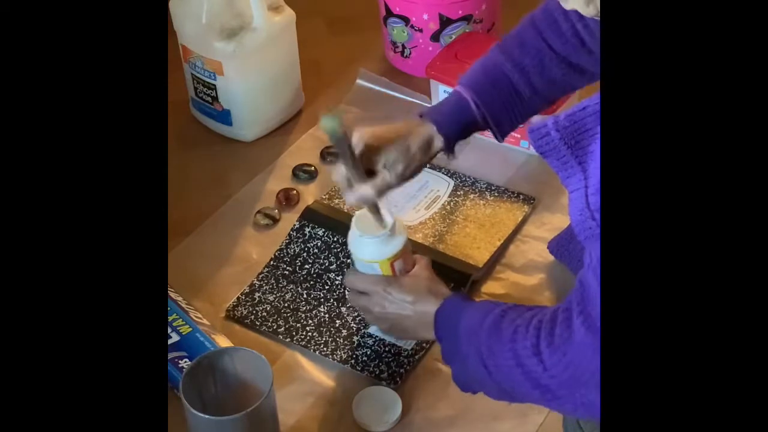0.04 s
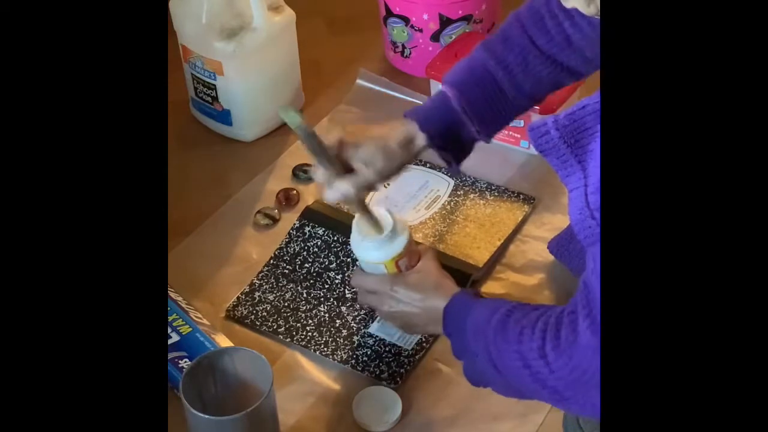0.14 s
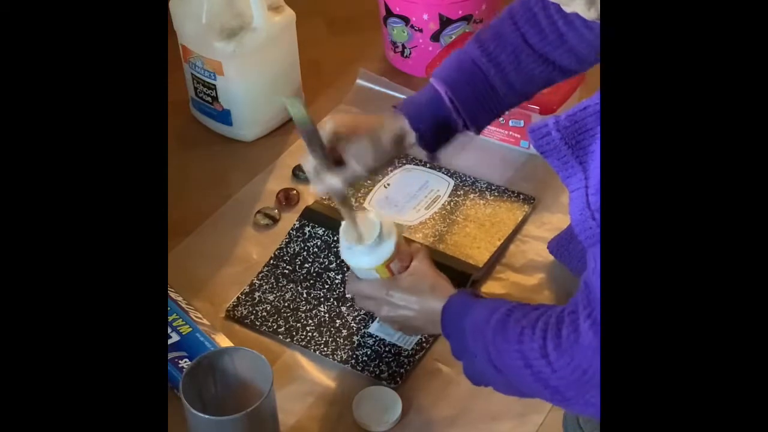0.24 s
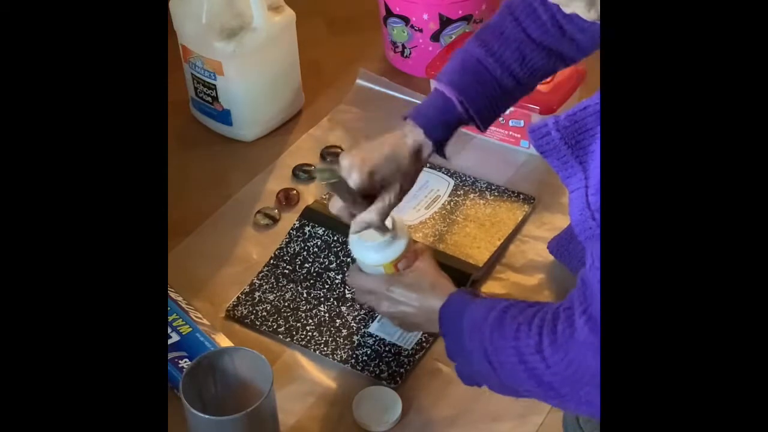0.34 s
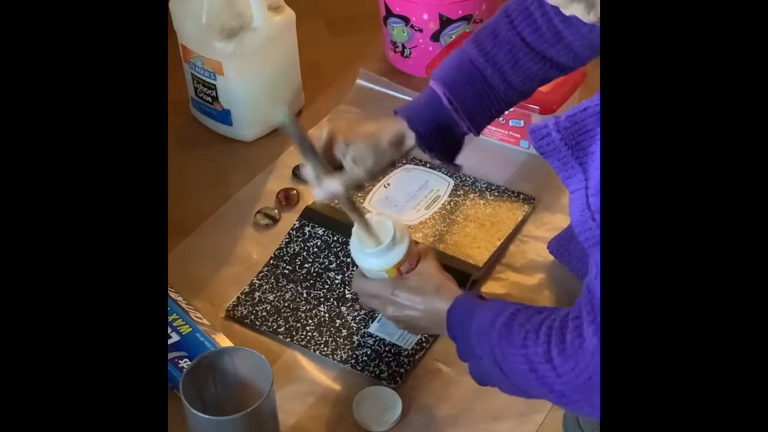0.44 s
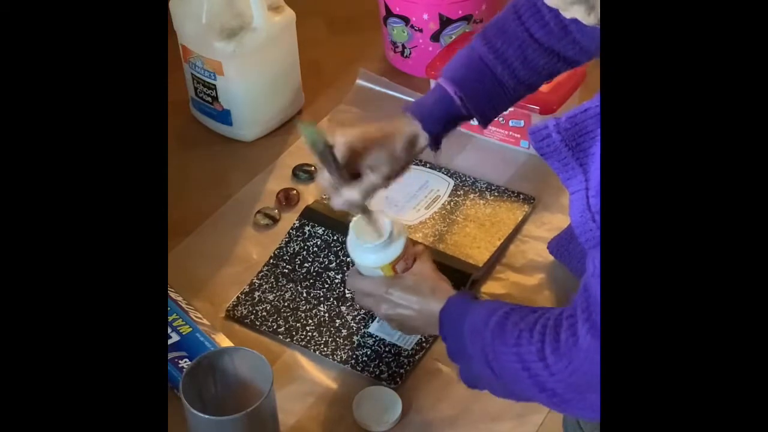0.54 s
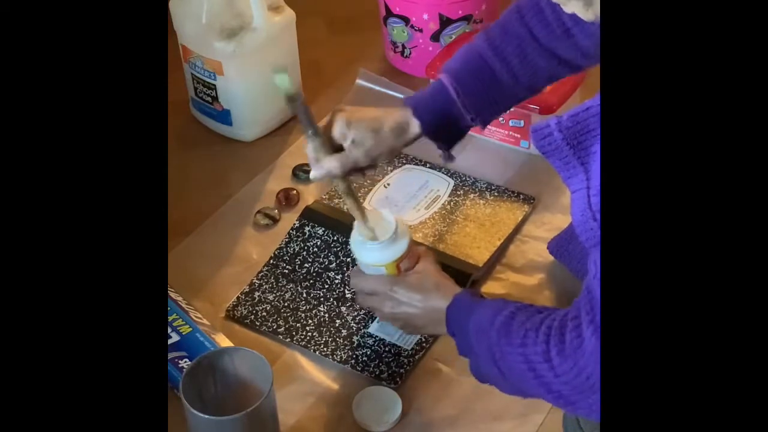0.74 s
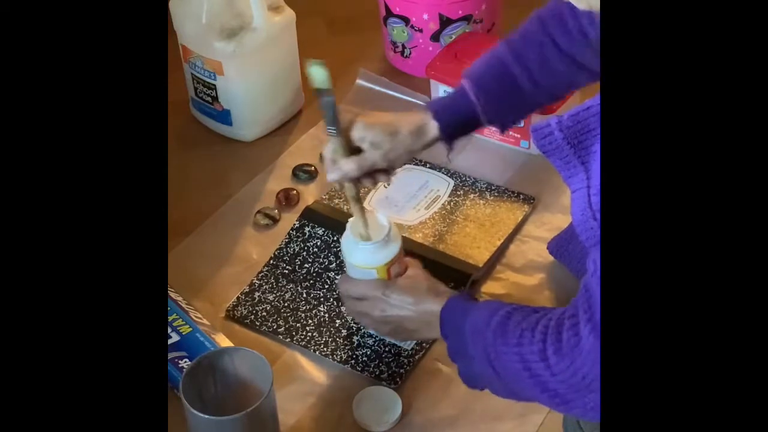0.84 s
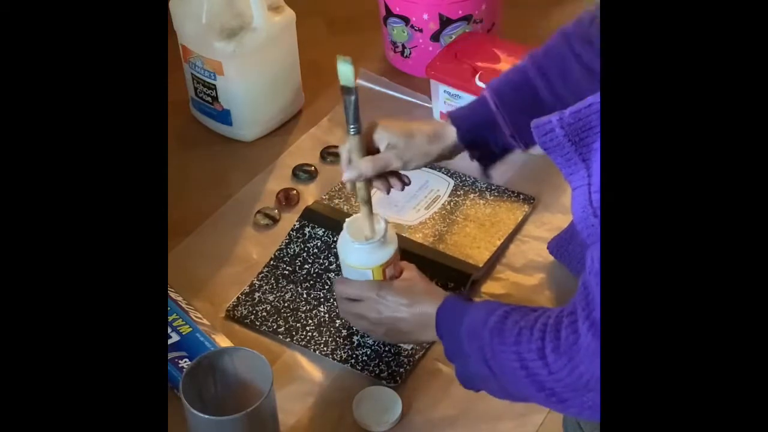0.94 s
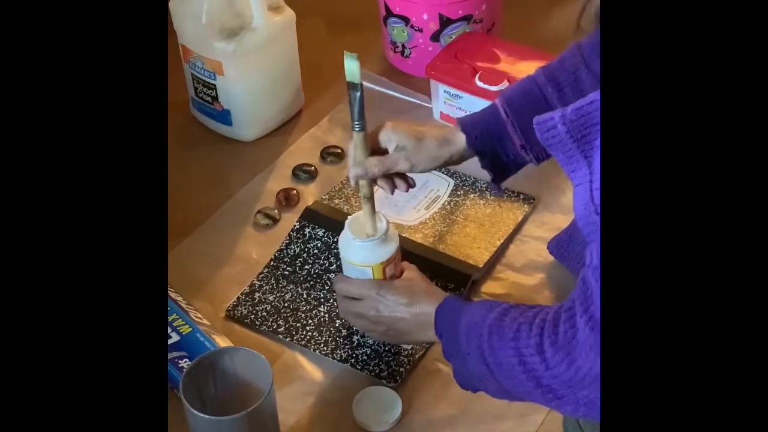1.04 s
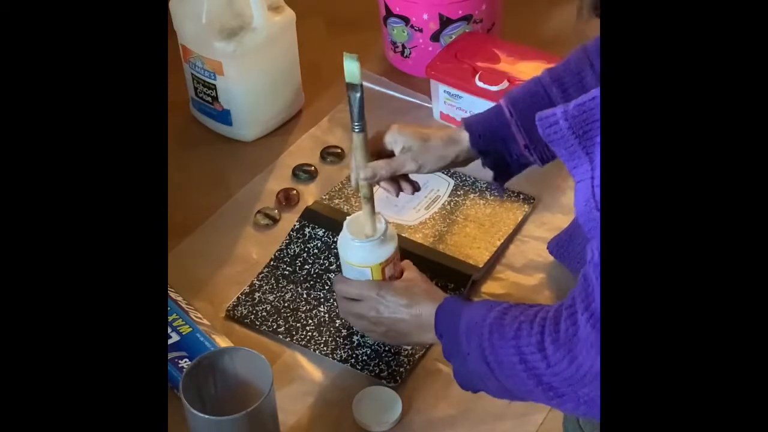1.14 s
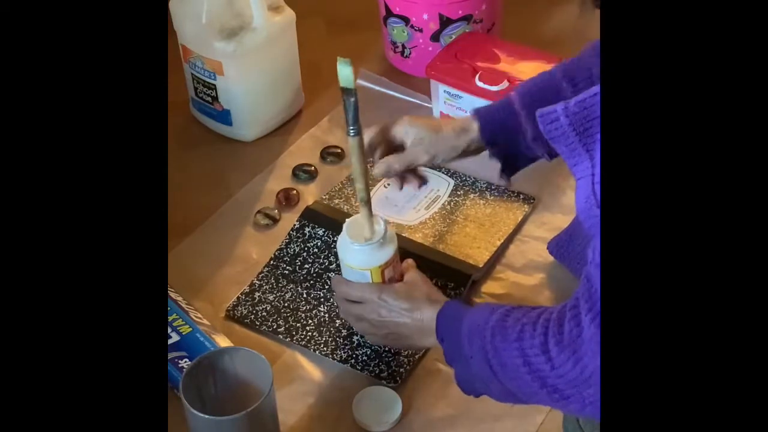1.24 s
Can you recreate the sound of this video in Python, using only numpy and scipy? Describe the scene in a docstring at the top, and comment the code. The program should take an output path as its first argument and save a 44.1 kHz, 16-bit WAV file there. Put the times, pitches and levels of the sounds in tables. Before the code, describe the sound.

Hollow knocks and sharp clicks of a brush handle stirring in a plastic jar, close, in a small room

```python
"""A knock on a plastic jar is still ringing as a brush handle stirs glue in it, on a table, over a low hum and hiss.
The handle clicks on the rim (dying modes, a noise snap, a late table thud) and knocks the wall (hollow sine swells).
Blows weaken after half a second; a sleeve rustles (grainy noise) as the hand lets go, with faint last touches.
A small room answers each blow with echoes and a diffuse tail; two close microphone ports listen."""
import sys
import numpy as np
from scipy import signal
from scipy.fft import rfft, irfft, next_fast_len
from scipy.io import wavfile
from scipy.ndimage import map_coordinates

SR = 44100
rng = np.random.default_rng(int(sys.argv[2]) if len(sys.argv) > 2 else 0)


def volts(x):
    """Linear amplitude factor 10**(x/20) for a level x in dB, scalar or array-like."""
    e = np.asarray(x, float) / 20
    return 10 ** e


def pcm_store(signal):
    """Save signal as 16-bit PCM."""
    levels = np.round(np.clip(np.atleast_2d(signal), -1, 1) * 32767)
    wavfile.write(sys.argv[1], SR, levels.astype(np.int16).T)


N = 57330
LEAD_IN = SR // 10  # samples before zero, for a knock that still rings

# table modes: f/Hz, level/dB, t60/s
TABLE_MODES = [(140.2, 0, 0.045), (187, 6, 0.032), (367.2, -8, 0.048), (502, 0, 0.052), (710, -2.5, .04)]


def along(points, hz):
    """Interpolates (f/Hz, value) points on a log frequency axis."""
    f, v = np.transpose(points)
    return np.interp(np.log(hz + 1), np.log(f + 1), v)


def filtered(x, response):
    """x times a complex response of frequency."""
    m = next_fast_len(x.shape[-1] + 8192)
    spectrum = rfft(x, m) * response(np.fft.rfftfreq(m, 1 / SR))
    return irfft(spectrum, m)[..., :x.shape[-1]]


def noise(colour, size):
    """Coloured noise of rms 1."""
    x = filtered(rng.standard_normal(size), lambda hz: volts(along(colour, hz)))
    return x / x.std()


def diffuse(three):
    """One shared signal plus, for each port, a part of its own; the sum keeps its power."""
    # own part relative to the shared: f/Hz, level/dB
    own_share = [(100, -14), (300, -3), (600, 3), (1500, 9), (2400, 16.5), (4000, -19), (12000, -13.5)]
    own = filtered(three[1:], lambda hz: volts(along(own_share, hz)))
    return filtered(three[0] + own, lambda hz: 1 / np.sqrt(1 + volts(2 * along(own_share, hz))))


def background():
    """Low rumble and faint hiss as diffuse noise; hum as sines wavering in level and phase."""
    # hum partials: f/Hz, level/dB
    hum_partials = [(59, -58), (121, -67.5), (208, -57.5)]
    # rumble spectrum: f/Hz, level/dB
    rumble_colour = [(12, -49), (25, -26.5), (58, -2.5), (85, -16.5), (125, -10.5), (160, -32.5),
                     (210, -11.5), (260, -34), (350, -32.5), (450, -31.5), (650, -33.5), (1100, -91)]
    # hiss spectrum: f/Hz, level/dB
    hiss_colour = [(300, 3), (600, -16.5), (1500, -14), (3000, -17), (6000, -19.5), (10000, -21.5),
                   (15500, -26), (16400, -60)]
    rumble_db, hiss_db, waver_hz = -53.5, -61, 9
    t = np.arange(N) / SR

    def waver():
        return map_coordinates(rng.standard_normal(int(N * waver_hz / SR) + 4), [t * waver_hz])

    hum = np.zeros(N)
    for hz, db in hum_partials:
        level = volts(db + 4 * waver())
        hum += level * np.sin(2 * np.pi * hz * t + 0.8 * waver())
    rumble = volts(rumble_db) * diffuse(noise(rumble_colour, (3, N)))
    hiss = volts(hiss_db) * diffuse(noise(hiss_colour, (3, N)))
    return hum + rumble + hiss


def sleeve():
    """Cloth friction: noise with a moving level and random grain."""
    # rustle level: t/s, level/dB
    rustle_level = [(.55, -48), (.62, -52.5), (0.678, -52), (0.719, -46.5), (.745, -40), (.775, -45.5),
                    (0.798, -54), (0.839, -58.5), (.9, -86), (1.101, -80.5), (1.3, -61.5)]
    # cloth spectrum: f/Hz, level/dB
    cloth_colour = [(180, -26.5), (300, -5), (600, -6.5), (800, -17.5), (930, 6), (1100, -9), (2000, -11.5),
                    (4000, -9.5), (7000, -24.5), (11000, -28.5), (15800, -48)]
    grain_samples, grain_depth_db = 150, 3.1
    s, db = np.transpose(rustle_level)
    grain = map_coordinates(rng.standard_normal(N // grain_samples + 4), [np.arange(N) / grain_samples])
    level_db = np.interp(np.arange(N) / SR, s, db) + grain_depth_db * grain
    return volts(level_db) * diffuse(noise(cloth_colour, (3, N)))


def reflections():
    """Direct sound plus dull, thin copies off near surfaces, one set per port."""
    # left port: delay/s, level/dB (before the band filter)
    left_echoes = [(.0063, -11), (.0104, -11), (.0153, -5.5), (.0224, -6.5), (.0319, -11.5), (.0375, -19),
                   (.0470, -17), (.0551, -13), (.0795, -18)]
    # right port: delay/s, level/dB (before the band filter)
    right_echoes = [(.0088, -9.5), (.0120, -14), (.0155, -8.5), (.0201, -15), (.0249, -8), (.0322, -14),
                    (.0383, -17), (.0427, -12.5), (.0500, -16)]
    dull_hz, thin_hz = 1500, 450
    taps = np.zeros((2, SR // 2))
    for port, echoes in enumerate([left_echoes, right_echoes]):
        for delay_s, db in echoes:
            taps[port, round(delay_s * SR)] = volts(db)
    taps = filtered(taps, lambda hz: 1 / (1 + (hz / dull_hz) ** 4) / (1 + (thin_hz / (hz + 1)) ** 4))
    taps[:, 0] += 1
    return taps


def diffuse_tail():
    """Fresh noise that builds up and decays at its own rate in each band."""
    # decay: f/Hz, t60/s
    decay_t60 = [(150, 0.5), (500, 0.21), (850, 0.35), (1300, 0.29), (2000, 0.24), (6000, 0.24),
                 (12000, 0.19)]
    # build-up: f/Hz, time constant/s
    build_up = [(300, .004), (600, 0.027), (1100, 0.027), (1700, 0.0054), (4000, 0.001)]
    # tail spectrum over the room level: f/Hz, level/dB
    tail_colour = [(150, -6), (400, 10.5), (850, -5.5), (1300, 4.5), (2000, -4.5), (2600, 2.5), (3400, 0.5),
                   (5000, -3), (12000, -7)]
    late_s = 0.0013
    hz, t, z = signal.stft(rng.standard_normal((3, SR // 2)), SR, nperseg=256)
    decay = volts(-60 * t / along(decay_t60, hz)[:, None])
    build = 1 - np.exp(-t / along(build_up, hz)[:, None])
    tail = signal.istft(z * decay * build, SR, nperseg=256)[1][:, :SR // 2]
    tail = diffuse(tail * (np.arange(SR // 2) > late_s * SR))
    return filtered(tail / np.linalg.norm(tail[0]), lambda hz: volts(along(tail_colour, hz)))


def room(hit, tail_db=0):
    """Convolves a blow with the near reflections and a diffuse tail."""
    room_db = -2.5
    response = reflections() + volts(room_db + tail_db) * diffuse_tail()
    return signal.fftconvolve(hit[None], response, axes=1)


def ring(modes, t, rise_s):
    """Dying modes, their levels a little different at each blow."""
    total = np.zeros(len(t))
    for hz, db, t60_s in modes:
        level = volts(db + rng.normal(0, 4.2) - 60 * t / t60_s)
        total += level * np.sin(2 * np.pi * hz * t)
    return (1 - np.exp(-t / rise_s)) * total


def crack(colour, t):
    """The short dry snap of contact: a noise burst."""
    t60_s, rise_s = 0.013, 0.0008
    return noise(colour, len(t)) * (1 - np.exp(-t / rise_s)) ** 2 * volts(-60 * t / t60_s)


def add(track, s, sound):
    """Mixes a sound in at a time in seconds."""
    start = LEAD_IN + round(s * SR)
    track[:, start:start + sound.shape[1]] += sound


def rim_clicks():
    """Handle on the rim: handle and rim modes ring, contact snaps, the table thuds a little later."""
    # clicks: t/s, ring level/dB, crack level/dB, table thud level/dB, tail over the room level/dB
    click_list = [(.0088, -18, -13.5, -24.5, 0), (.1580, -13, -10.5, -29, 2.5),
                  (0.2594, -14, -5.5, -28, 0.5), (0.4145, -10.5, -11, -26, 1),
                  (0.502, -24.5, -58.5, -35, -1), (0.604, -44.5, -69, -52, 3.5), (0.618, -32, -71, -76, -3),
                  (.7040, -26, -44, -44, -0.5), (0.7569, -27, -31, -34, 0.5), (0.8596, -43.5, -57, -73, -3)]
    # handle modes: f/Hz, level/dB, t60/s
    handle_modes = [(1932, -2, 0.026), (2020, -3, 0.029)]
    # rim modes, relative to the crack: f/Hz, level/dB, t60/s
    rim_modes = [(3370, -1, .007), (5300, -8, .005), (6900, -4, .01), (7600, -6, .005), (9900, -10, .006)]
    # crack spectrum: f/Hz, level/dB
    crack_colour = [(300, -36), (1000, -17), (1500, -16), (2600, -37), (4000, -3.5), (6000, -8), (9000, -2),
                    (12000, -17.5), (15000, -21), (16000, -36.5)]
    thud_late_s, thud_rise_s, ring_rise_s = 0.004, 0.0047, 0.0015
    track, t = np.zeros((2, LEAD_IN + N + SR)), np.arange(SR // 5) / SR
    for s, ring_db, crack_db, thud_db, tail_db in click_list:
        thud = volts(thud_db) * ring(TABLE_MODES, np.maximum(t - thud_late_s, 0), thud_rise_s)
        snap = volts(crack_db) * (crack(crack_colour, t) + ring(rim_modes, t, ring_rise_s))
        handle = volts(ring_db) * ring(handle_modes, t, ring_rise_s)
        add(track, s, room(handle + snap + thud, tail_db))
    return track[:, LEAD_IN:LEAD_IN + N]


def wall_knocks():
    """Handle on the wall: a knock squeezes a hollow boom of air from the jar, with a slap and some table."""
    # knocks: t/s, boom level/dB, crack level/dB, boom f/Hz
    knock_list = [(-.0620, -16, 3, 881), (.0070, -33, -48, 940), (.0330, -27.5, -37, 874),
                  (.2152, -8, -7, 868), (.4646, 0.5, -5.5, 841.5), (.5460, -26.5, -65, 918),
                  (.7050, -37.5, -69, 888), (.7350, -51, -51, 870), (.7620, -52, -30, 936)]
    # slap spectrum: f/Hz, level/dB
    slap_colour = [(300, -19.5), (900, -6.5), (1400, -4), (2200, -15.5), (4000, -4.5), (7000, -11.5),
                   (10000, -18), (13000, -43), (16000, -39.5)]
    boom_s, boom_lean = 0.012, 1.05  # length of the swell; lean under 1 peaks early
    brush_early_s, brush_db = 0.008, -27  # a faint touch before each knock, re its boom
    table_gain, table_rise_s = 0.091, 0.0047
    track, t = np.zeros((2, LEAD_IN + N + SR)), np.arange(SR // 5) / SR
    swell = np.sin(np.pi * np.minimum(t / boom_s, 1) ** boom_lean) ** 2
    for s, boom_db, crack_db, hz in knock_list:
        boom = volts(boom_db) * swell * np.sin(2 * np.pi * hz * t)
        slap = crack(slap_colour, t) + table_gain * ring(TABLE_MODES, t, table_rise_s)
        blow = np.roll(boom + volts(crack_db) * slap, round(brush_early_s * SR))
        add(track, s - brush_early_s, room(volts(brush_db) * boom + blow))
    return track[:, LEAD_IN:LEAD_IN + N]


def scene():
    """Everything in front of the ports."""
    return background() + sleeve() + rim_clicks() + wall_knocks()


def low_pass(x):
    """Removes everything above the highest recorded frequency."""
    return signal.sosfilt(signal.butter(12, 16440, fs=SR, output="sos"), x)


def record(dry):
    """Two channels that differ in phase and level, band-limited; loud peaks clip."""
    # left channel's phase lead over the right: f/Hz, phase/rad
    channel_lead = [(0, 0), (900, -.4), (1500, -.4), (2240, .85), (2900, 1.5), (3600, 1.5), (4300, 2.85),
                    (5000, 3.4), (5700, 4.6), (6400, 5.9), (7060, 6.4), (7750, 7.5), (8440, 8.9), (9130, 9.4),
                    (9820, 10.7), (10500, 12.1), (11500, 12.6), (12600, 14.9), (13600, 15.7), (14600, 18.3),
                    (16100, 19)]
    # left over right: f/Hz, level/dB
    channel_balance = [(200, .6), (500, -.5), (850, -2.5), (1500, -2.5), (2300, -.3), (8000, 0)]
    top_hz, clip_level = 16200, 1.0

    def half(hz):
        """Half the difference: the left channel takes it, the right its inverse."""
        phase_rad = np.interp(hz, *np.transpose(channel_lead))
        return volts(along(channel_balance, hz) / 2) * np.exp(0.5j * phase_rad)

    channels = filtered(dry, lambda hz: np.array([half(hz), 1 / half(hz)]) * (hz < top_hz))
    mix = np.clip(channels, -clip_level, clip_level)
    return low_pass(mix)


dry = scene()
out = record(dry)
pcm_store(out)
```